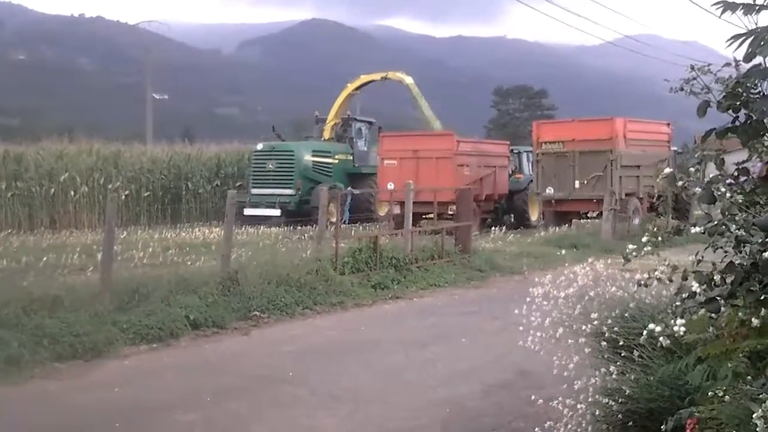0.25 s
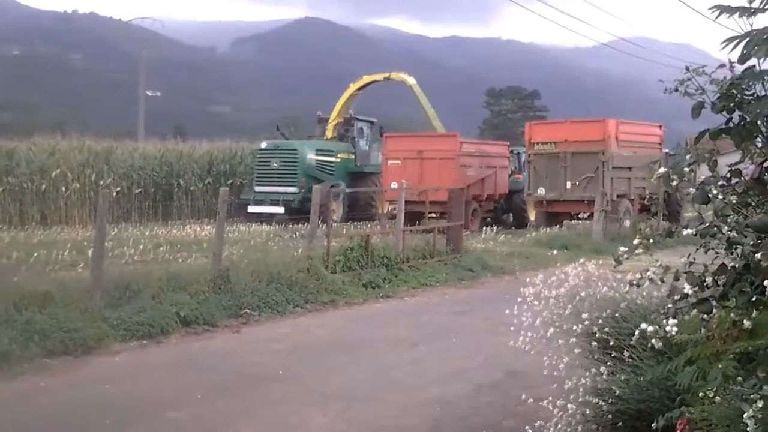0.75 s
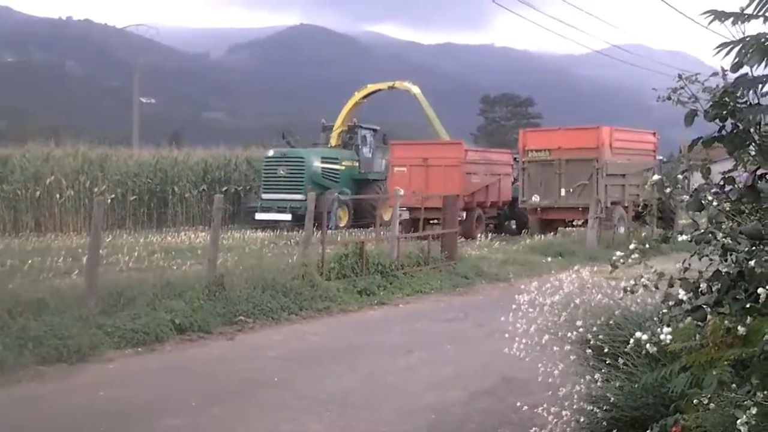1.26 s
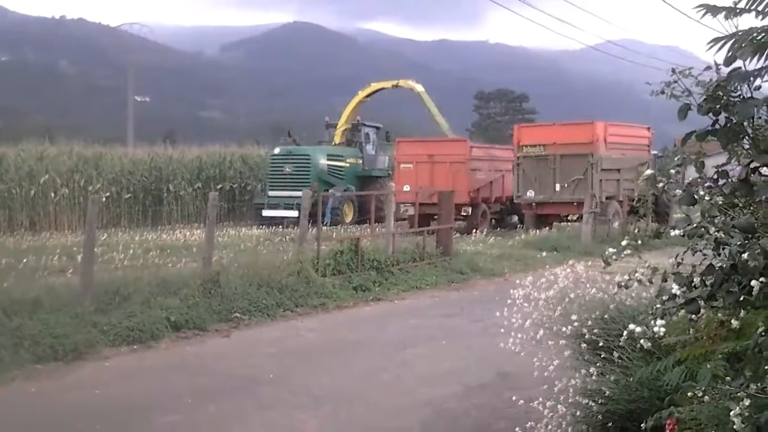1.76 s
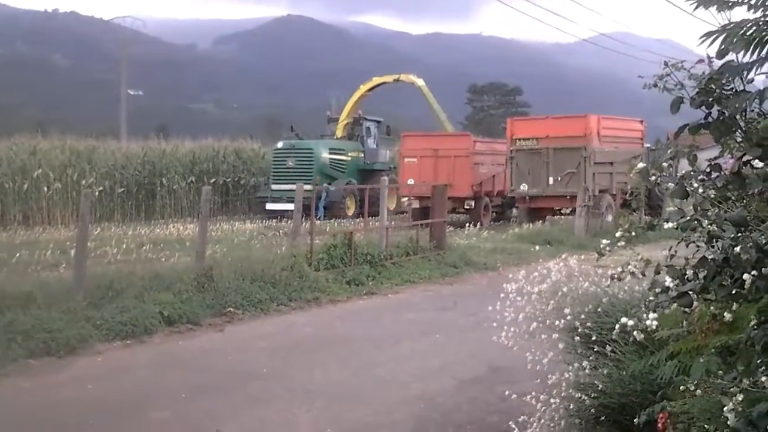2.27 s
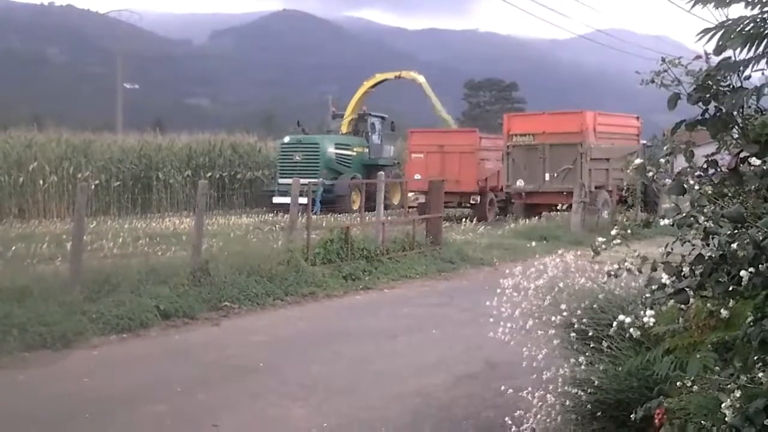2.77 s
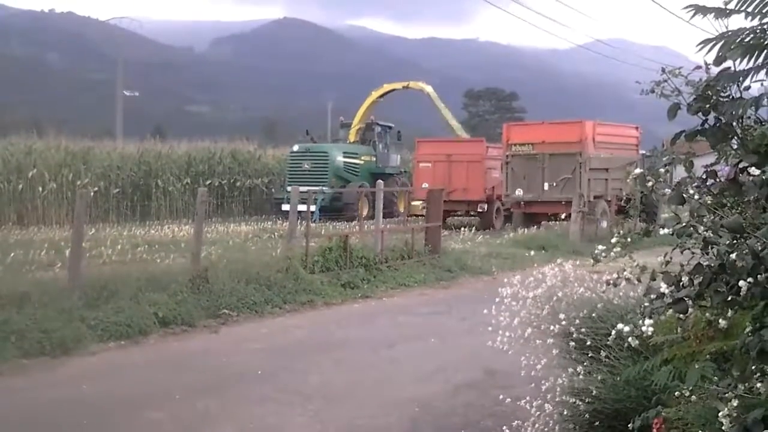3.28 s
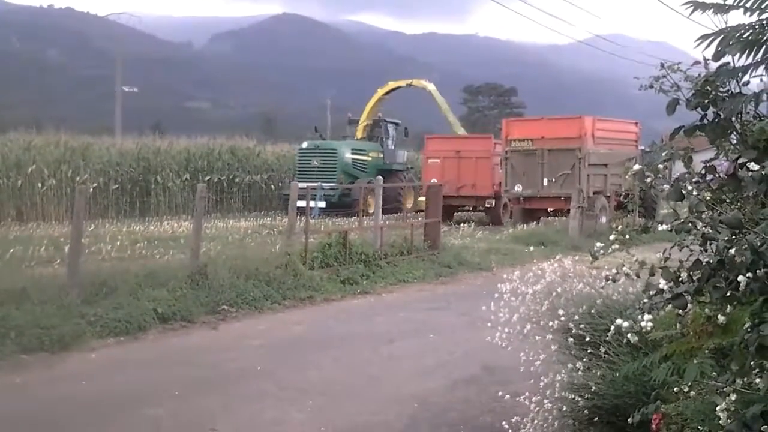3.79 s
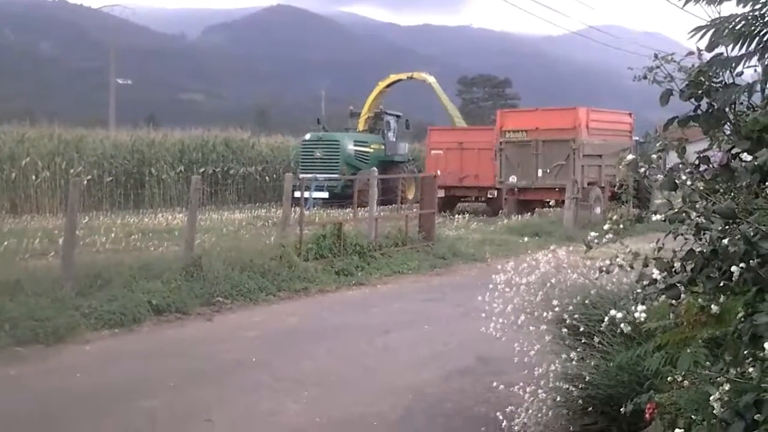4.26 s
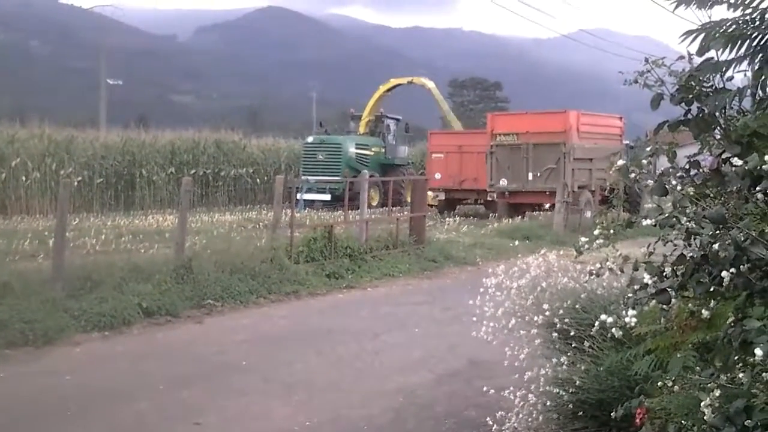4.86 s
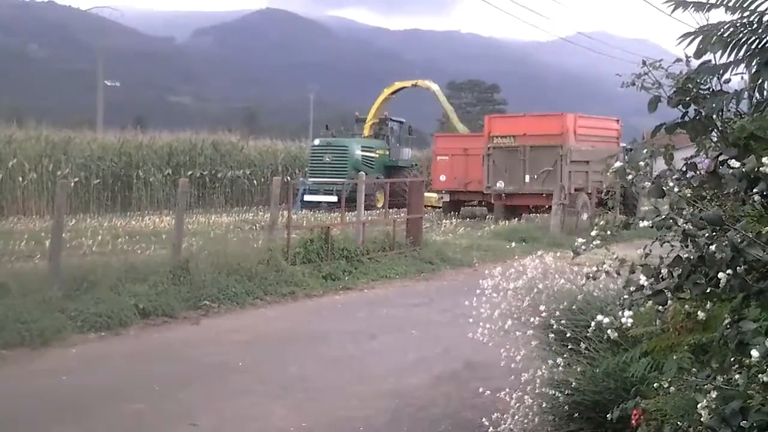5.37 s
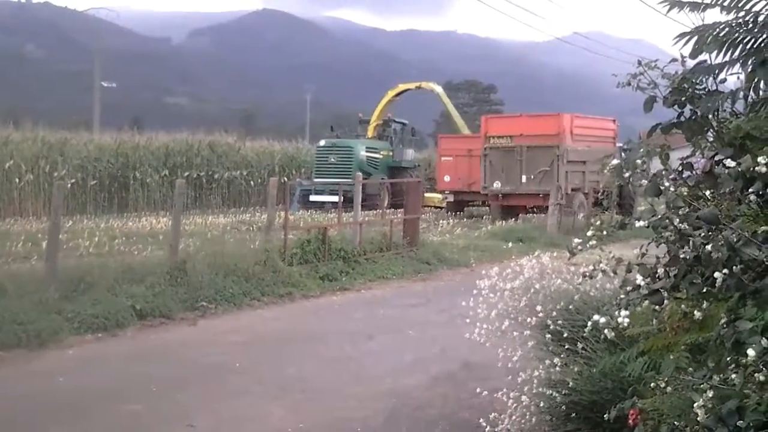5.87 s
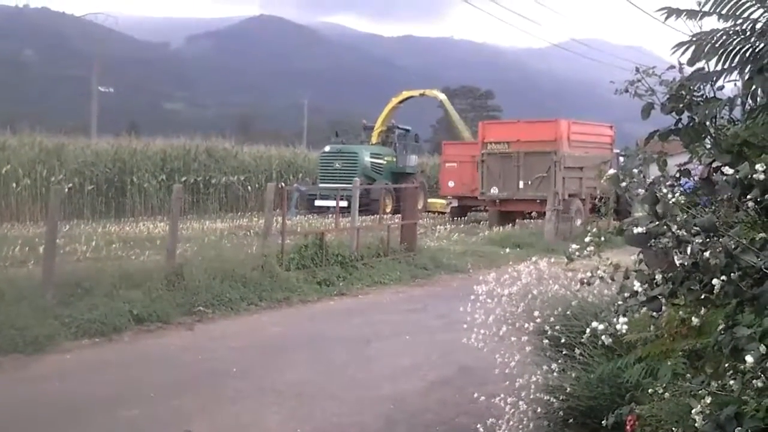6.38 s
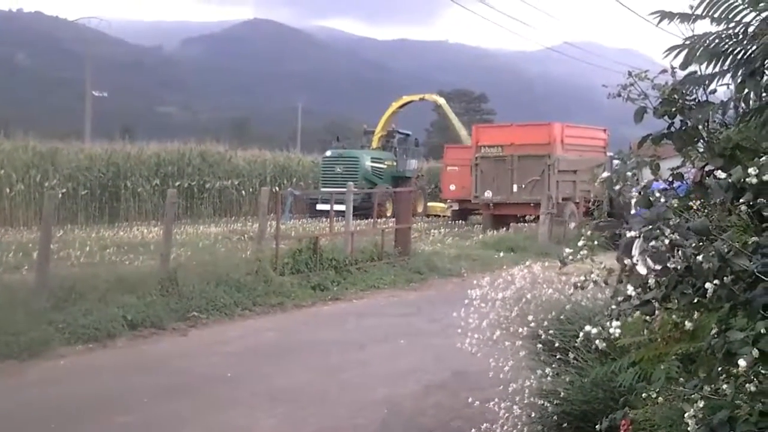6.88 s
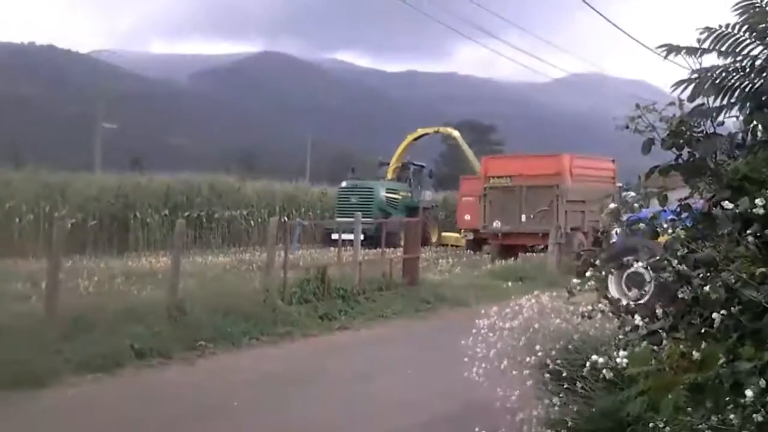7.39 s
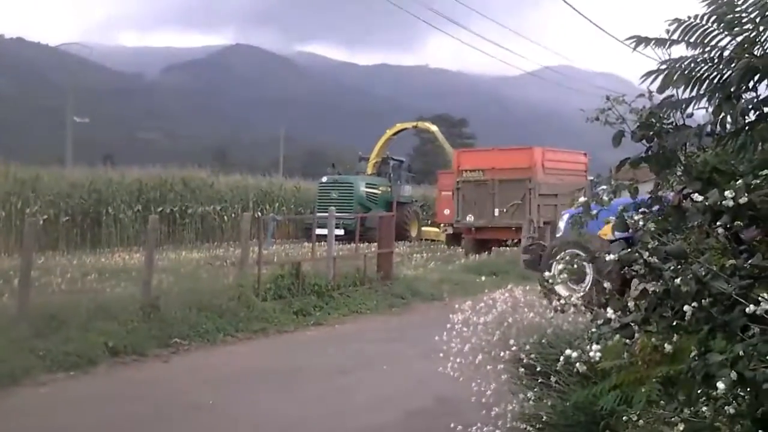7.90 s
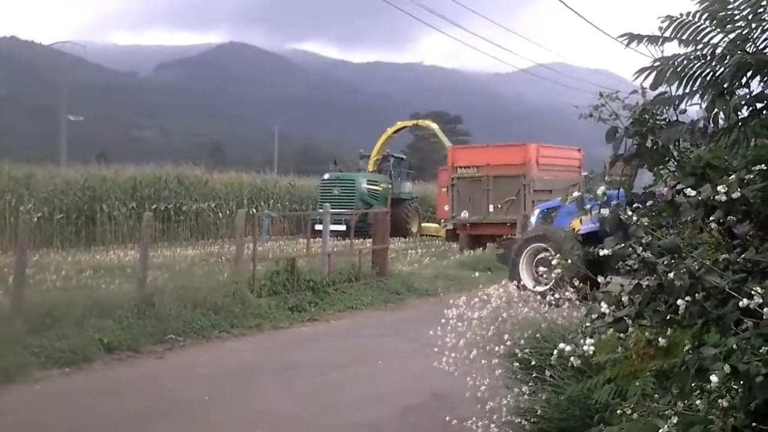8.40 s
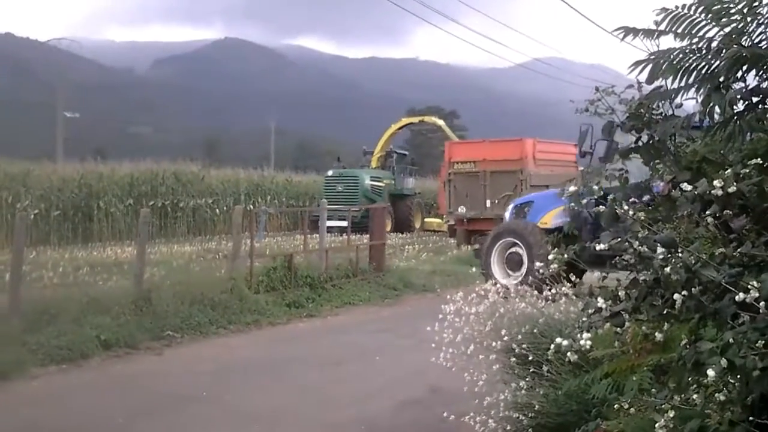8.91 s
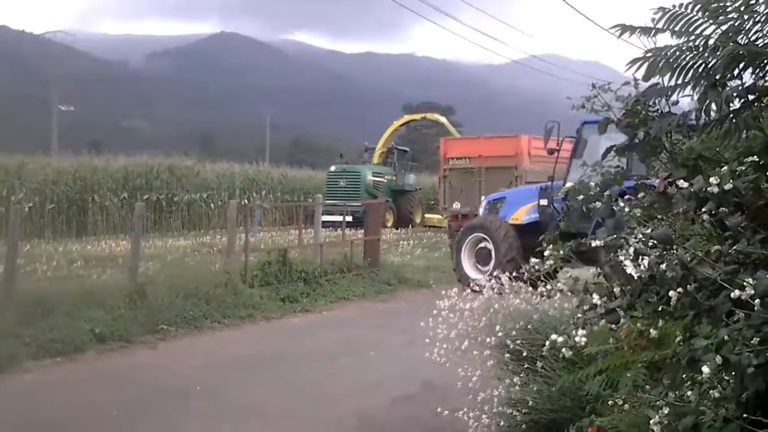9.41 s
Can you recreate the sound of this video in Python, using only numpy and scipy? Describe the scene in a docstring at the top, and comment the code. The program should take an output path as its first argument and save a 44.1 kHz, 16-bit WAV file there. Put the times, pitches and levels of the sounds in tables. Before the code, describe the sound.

A forage harvester is chopping maize in an open field from the start and runs for the whole ten seconds or so. Its diesel engine drones and clatters, with a swelling and sinking hum from the knives and a higher blower whine. Stalks rumble in the feed, howl around the drum and hiss up a steel spout, which rings in soft surges. The tones sag slightly together under load, around 1 second and most clearly near 5.7 seconds, then recover. The harvester slowly gets quieter throughout. Close to the microphone, leaves rustle very faintly in a few puffs from about 2.5 seconds on, and one short, dry tick sounds at about 5.6 seconds. From around 6 seconds a tractor draws near, its rush of engine and fan peaking just after 7 seconds, then easing a little and blending with the harvester to the end.

```python
"""In a maize field, a forage harvester chops the crop. One shaft turns its six-cylinder diesel, knife
drum and blower, so their notes sink together when thick crop drags the shaft down. Stalks rumble in
the feed, howl round the drum and hiss up the steel spout, which rings as wads hit it. The harvester
slowly fades. Close by, leaves rustle and something ticks once; a tractor draws near behind a bush."""
import sys
import numpy as np
from scipy.fft import rfft, irfft, next_fast_len
from scipy.io import wavfile
from scipy.ndimage import uniform_filter1d, minimum_filter1d, map_coordinates

SR = 44100
rng = np.random.default_rng(int(sys.argv[2]) if len(sys.argv) > 2 else 0)


def waveform_to_disk(signal):
    """Save audio, clipped to [-1, 1], as 16-bit WAV at the path in sys.argv[1]."""
    frames = np.transpose(np.atleast_2d(signal))
    scaled = np.clip(frames, -1, 1) * 32767
    samples = np.round(scaled).astype(np.int16)
    wavfile.write(sys.argv[1], SR, samples)


N = 425565
TURN_S = 5.55  # the harvester has finished turning by then


def seconds():
    """The time of each sample."""
    return np.arange(N) / SR


def amp(db):
    """Turn decibels into a number to multiply by."""
    return 10 ** (np.asarray(db) / 20)


def unit(x):
    """Scale a sound to an average strength (rms) of 1."""
    return x / np.sqrt(np.mean(x ** 2) + 1e-20)


def curve(rows):
    """Join (time, value) points with straight lines."""
    return np.interp(seconds(), *np.transpose(rows))


def swells(events, half_width_s):
    """A smooth bump or dip in dB around each (time, lift) event."""
    return sum(db * np.exp(-((seconds() - s) / half_width_s) ** 2) for s, db in events)


def wobble(rate):
    """A smooth random curve through `rate` points a second."""
    points = rng.standard_normal(int(N * rate / SR) + 4)
    return map_coordinates(points, [np.arange(0, N, 64) * rate / SR]).repeat(64)[:N]


def part_db(sag, start_db, db_per_s, db_per_sag):
    """A part's level drifts as the harvester moves and follows the sag (turns a second lost to load)."""
    return start_db + db_per_s * seconds() + db_per_sag * sag


def filtered(x, response):
    """Turn each frequency of x up or down by response(hz)."""
    size = next_fast_len(N + SR // 2)
    return irfft(rfft(x, size) * response(np.fft.rfftfreq(size, 1 / SR)), size)[:N]


def noise(spectrum, rings=(), drive=None):
    """Shape a drive (plain hiss if none is given) with a spectrum and its ringing peaks."""
    f, db = np.transpose(spectrum)
    lift = lambda hz: sum(g * np.exp(-.5 * ((hz - mid) / width) ** 2) for mid, width, g in rings)
    colour = lambda hz: amp(np.interp(np.log(hz + 1), np.log(f), db) + lift(hz))
    return unit(filtered(rng.standard_normal(N) if drive is None else drive, colour))


def tone(cycles, fade_db, flutter):
    """One note: its path over the field makes it fade in and out, the uneven load makes it flutter."""
    phase = 2 * np.pi * (cycles + rng.random()) + flutter * wobble(14)
    fading = amp(fade_db * wobble(2.02))
    return np.sqrt(2) * fading * (1 + flutter * wobble(14)) * np.sin(phase)


def firings(turns, depth, uneven):
    """Noise in puffs, three a turn, every other one louder; a little of it repeats every two turns."""
    cycle = rng.standard_normal(2048)
    repeating = unit(map_coordinates(cycle, [turns / 2 % 1 * len(cycle)], order=1, mode="grid-wrap"))
    rattle = .15 * repeating + .99 * rng.standard_normal(N)
    phase = 2 * np.pi * 3 * turns
    return rattle * np.exp(depth * np.cos(phase) + uneven * np.cos(phase / 2))


# The exhaust's main hum: t/s, level/dB
HUM_LEVEL = [(0, -31.5), (.45, -31), (1.0, -24.5), (1.55, -26.5), (1.85, -24), (2.2, -26), (2.5, -32),
             (2.95, -29.5), (3.4, -25), (3.9, -28.5), (4.35, -28), (5.05, -27.5), (5.33, -29.5),
             (5.55, -26), (6.0, -25), (6.3, -29), (6.75, -26.5), (7.3, -27.5), (8.1, -37.5), (8.5, -30.5),
             (9.1, -30.5), (9.55, -26.5)]
# Its strong notes: f/shaft speed, starting level/dB, drift/(dB per s), lift/(dB per unit of sag)
STRONG_NOTES = [(8, -27, -.5, 0), (9, -25.5, 0, 1), (10, -26, -0.72, 2), (11, -32.5, 0.66, 2),
                (12, -44, 0.75, -2), (21, -32.5, -0.79, -0.5), (22, -32.5, -0.82, 0.5),
                (22.5, -35, -0.2, 0.5), (23.5, -40, -0.73, 0)]
# One strong note swells or sinks: t/s, f/shaft speed, lift/dB, half width/s
NOTE_SWELLS = [(.25, 12, 8, .15), (.45, 10, -6, 0.44), (1.15, 10, 2, .3), (1.95, 23.5, 13, .25),
               (2.8, 23.5, 18.5, 0.21), (3.15, 9, -8, 0.22), (3.9, 22, 5, .25), (4.25, 8, -4, 0.21),
               (4.6, 10, -13, 0.47), (4.9, 11, -7, .24), (4.55, 9, 3, 0.27), (5.6, 8, -11, .2),
               (5.9, 11, 2.5, .35), (6.85, 22.5, 6, .4), (7.2, 12, 4, 0.18), (8.05, 12, 7.5, .22),
               (9.2, 21, 3.5, 0.44), (7.05, 8, -8, 0.2), (7.7, 9, 6.5, 0.15), (8.45, 11, -4, 0.12),
               (8.65, 10, 9, 0.42), (9.15, 11, 2, .3), (9.3, 9, -2.5, .5), (9.3, 10, 4, .3),
               (9.35, 8, 5.5, .25), (9.3, 12, 8, 0.45)]
# Its faint notes: f/shaft speed, level/dB
FAINT_NOTES = [(3, -56.5), (4, -47.5), (5, -54.5), (6.5, -53), (10.5, -36), (18, -51), (19, -43.5),
               (23, -43.5), (25, -44), (29, -45)]

def exhaust(turns, sag):
    """Exhaust puffs hum at twice the firing rate, among other notes tied to the shaft speed."""
    drone = amp(curve(HUM_LEVEL)) * tone(6 * turns, fade_db=.5, flutter=.085)
    for multiple, *level_rule in STRONG_NOTES:
        lift_db = sum(swells([(s, db)], half_s) for s, k, db, half_s in NOTE_SWELLS if k == multiple)
        level_db = part_db(sag, *level_rule) + lift_db
        drone += amp(level_db) * tone(multiple * turns, fade_db=.8, flutter=.057)
    return drone + sum(amp(db) * tone(k * turns, fade_db=2, flutter=.12) for k, db in FAINT_NOTES)


# The knife drum's note: t/s, level/dB
KNIFE_LEVEL = [(0, -16.5), (.2, -15.5), (.55, -24), (.72, -29.5), (.9, -17.5), (1.15, -16.5), (1.35, -20),
               (1.52, -26), (1.7, -16.5), (2.15, -36), (2.45, -23.5), (2.8, -18.5), (3.08, -27), (3.3, -22),
               (3.6, -29.5), (3.95, -22), (4.17, -25.5), (4.35, -26), (4.7, -28.5), (4.95, -23),
               (5.35, -16.5), (5.5, -22.5), (5.8, -17.5), (6.15, -25.5), (6.5, -19), (7.3, -27.5),
               (7.6, -24.5), (7.9, -22), (8.5, -27), (9.3, -28.5), (9.65, -35)]

def knives(turns, cuts_per_turn=7.6):
    """Knives sweep past a fixed bar so fast that the cuts blend into a note."""
    return amp(curve(KNIFE_LEVEL)) * tone(cuts_per_turn * turns, fade_db=.2, flutter=.1)


# The blower's main note swells or sinks: t/s, lift/dB
BLOWER_LIFTS = [(.7, -12), (2.75, 6), (3.95, 4), (4.95, 9.5), (5.65, -6), (6.3, 4), (7.1, 9.5), (7.6, 3),
                (9.3, -6)]
# Its other notes: f/paddle rate, level/dB
PADDLE_NOTES = [(2, -39.5), (4, -43), (5, -50.5), (6, -38), (7, -42), (8, -48.5)]

def blower(turns, sag, paddles_per_turn=3.433):
    """Paddles pass the blower's outlet; the main note is three times as fast as they pass."""
    paddles = paddles_per_turn * turns
    level_db = part_db(sag, -29.5, db_per_s=-.36, db_per_sag=-.5) + swells(BLOWER_LIFTS, .34)
    main = amp(level_db) * tone(3 * paddles, fade_db=1, flutter=.1)
    return main + sum(amp(db) * tone(k * paddles, fade_db=2.3, flutter=.15) for k, db in PADDLE_NOTES)


def gears(turns, sag, teeth_per_turn=28.66):
    """Gear teeth meet and make a faint whine."""
    level_db = part_db(sag, -40.5, db_per_s=-.55, db_per_sag=-.5)
    return amp(level_db) * tone(teeth_per_turn * turns, fade_db=1, flutter=.4)


# The feed's low rumble: f/Hz, level/dB
FEED_SPECTRUM = [(20, -50.5), (50, -56), (85, -38.5), (125, -28), (155, -17), (195, -14), (228, -13),
                 (285, 0.5), (345, -1), (390, -6), (430, -10.5), (500, -15.5), (580, -20), (640, -20),
                 (1000, -82.5)]
# The crop runs thin for a moment: t/s, level change/dB
FEED_LULLS = [(.6, -1.5), (3.2, -4), (4.2, -2), (5.55, -1.5)]

def feed(sag):
    """Stalks rumble as they are pulled in; near the end the rumble fades faster, baring the engine."""
    level_db = part_db(sag, -19.5, db_per_s=-.28, db_per_sag=.1) + swells(FEED_LULLS, .14)
    late_fade_db = -2.2 * np.maximum(seconds() - 8.5, 0)
    return amp(level_db + late_fade_db + .58 * wobble(5)) * noise(FEED_SPECTRUM)


# The howl round the drum: t/s, level/dB
HOWL_LEVEL = [(0, -24), (.6, -24), (1.1, -23), (2.55, -22.5), (3.1, -26), (3.55, -24.5), (3.9, -22),
              (4.3, -25.2), (4.65, -23), (5.1, -28), (5.5, -25), (5.95, -24.5), (6.3, -27.5), (6.6, -25.5),
              (7.1, -26), (7.6, -28), (9.65, -28.5)]
# Its overall colour: f/Hz, level/dB
HOWL_SPECTRUM = [(400, -48), (590, -18), (690, -6), (740, 1.5), (800, 1), (880, -2.5), (950, -10.5),
                 (1040, -10.5), (1200, -31.5), (2000, -73)]
# Narrow peaks and dips of the drum's housing: f/Hz, width/Hz, lift/dB
HOWL_RINGS = [(710, 10, -1.5), (740, 10, 2.5), (767, 10, -2), (788, 10, 2), (897, 14, 3)]

def drum_howl(turns):
    """Stalks howl in the drum's housing while the engine shakes it."""
    level_db = curve(HOWL_LEVEL) + .61 * wobble(12)
    return amp(level_db) * noise(HOWL_SPECTRUM, HOWL_RINGS, firings(turns, depth=.069, uneven=.079))


# Ringing sheet metal: f/Hz, width/Hz, lift at the start/dB, lift after the turn/dB
METAL_RINGS = [(1860, 45, -5.5, 0), (2060, 60, 7.5, 8), (2300, 80, -1, -0.5), (2502, 40, 5, 2.5),
               (2768, 152, 6, 5.5), (3260, 88, -7, -6.5), (3450, 66, 0.5, 4), (3850, 110, 2, -4),
               (4317, 163, 7.5, 5.5), (4530, 31, 1, 2.5), (4730, 80, 2.5, -5.5), (4880, 60, 2.5, 0),
               (5830, 150, -3.5, -0.5), (6190, 110, 4, 3), (6550, 70, -4, -2.5), (7300, 90, -7, -3),
               (7620, 110, 2, -3)]

def sheet_metal(spectrum, turns, depth, uneven, slide):
    """Engine puffs ring the panels; as the harvester turns, the peaks blend into slightly higher ones."""
    before = [(hz * (1 - slide), width, db) for hz, width, db, _ in METAL_RINGS]
    after = [(hz * (1 + slide), width, db) for hz, width, _, db in METAL_RINGS]
    start, end = (noise(spectrum, rings, firings(turns, depth, uneven)) for rings in (before, after))
    turned = np.minimum(seconds() / TURN_S, 1)
    return np.sqrt(1 - turned) * start + np.sqrt(turned) * end


# The engine's clatter: f/Hz, level/dB
CLATTER_SPECTRUM = [(500, -44.5), (1000, -3), (1350, -2), (1550, -6), (1750, -2), (2300, -6), (2900, -4.5),
                    (3250, -6.5), (4500, -17.5), (7000, -18.5), (10000, -69)]

def clatter(turns, sag):
    """Each firing knocks the engine block and rattles the hood."""
    level_db = part_db(sag, -21.5, db_per_s=-.49, db_per_sag=-.1) + .25 * wobble(14)
    return amp(level_db) * sheet_metal(CLATTER_SPECTRUM, turns, depth=.14, uneven=.057, slide=.011)


# Crop sliding on steel: f/Hz, level/dB
SPOUT_SPECTRUM = [(1500, -26), (3200, -7.5), (3600, -0.5), (4000, -2), (5000, -2.5), (5500, -9.5),
                  (6400, -14.5), (7600, -18), (8400, -28), (10000, -35.5), (11000, -73.5)]
# Wads hit the spout: t/s, lift of the low ring/dB, lift of the high ring/dB
WADS = [(.05, -6, 5.5), (.8, -2, 5), (1.35, 3, 1), (1.65, 7, -2), (2.25, 9.5, 1), (2.6, 7.5, 4.5),
        (3.4, 3, 4.5), (3.62, 6.5, 7.5), (3.85, 10.5, -1), (4.95, 8, 3), (5.35, 10, 4.5), (5.8, 10, 4.5),
        (6.1, 10, -5), (6.65, 11.5, 1), (6.901, 8, 0), (7.25, 9.5, 2), (7.75, -4, 4.5), (8.7, -2, 4)]
# The two rings: starting f/Hz, f after the turn/Hz, width/Hz, resting level/dB, drift/(dB per s)
SPOUT_RINGS = [(2697, 2790, 290, -35, -0.77), (4280, 4480, 210, -32, -0.69)]

def spout(turns, sag):
    """Crop hisses along the spout, and wads swell two rings that creep upward as the harvester turns."""
    times, *lifts = np.transpose(WADS)
    surges_db = [swells(zip(times, lift), half_width_s=.17) for lift in lifts]
    hiss_db = part_db(sag, -23, db_per_s=-.84, db_per_sag=-.4) + .18 * sum(surges_db) + .71 * wobble(16)
    out = amp(hiss_db) * sheet_metal(SPOUT_SPECTRUM, turns, depth=.14, uneven=.098, slide=.0082)
    turned = np.minimum(seconds() / TURN_S, 1)
    pulsing = amp(np.cos(2 * np.pi * 3 * turns))  # 1 dB up and down with each firing
    for (start_hz, end_hz, width_hz, rest_db, db_per_s), surge_db in zip(SPOUT_RINGS, surges_db):
        phase = 2 * np.pi * np.cumsum(start_hz + (end_hz - start_hz) * turned) / SR
        band = lambda hz: 1 / (1 + (2 * hz / width_hz) ** 2)
        # Multiplying by a wave moves low noise up to the ring's pitch.
        ring = sum(filtered(rng.standard_normal(N), band) * wave(phase) for wave in (np.cos, np.sin))
        level_db = rest_db + db_per_s * seconds() + surge_db + .8 * wobble(14)
        out += amp(level_db) * unit(ring * pulsing)
    return out


# Puffs of breeze in the bush: t/s, lift/dB
BREEZES = [(2.65, 6.5), (3.7, 6), (5, 7.5), (5.4, 5.5), (7.35, 3.5), (8.95, 5), (9.55, 6)]
# The thin rustle of leaves: f/Hz, level/dB
LEAF_SPECTRUM = [(2000, -24.5), (5000, -28), (8000, 13), (9000, 6), (10200, 10), (10900, -27.5),
                 (13000, -23)]

def leaves():
    """The breeze stirs nearby leaves in small, gritty flurries."""
    grit = amp(2.2 * wobble(300)) * rng.standard_normal(N)
    level_db = -53 + swells(BREEZES, half_width_s=.39) + 1.5 * wobble(25)
    return amp(level_db) * noise(LEAF_SPECTRUM, drive=grit)


# One tick close by: t/s, level/dB
TICK = [(5.579, -6)]

def tick():
    """A dry tick: three high blips at once, over in about a millisecond."""
    out = np.zeros(N)
    for s, db in TICK:
        t = seconds() - s
        for hz, blip_db, half_s in [(3800, -2, .00066), (6000, -15, .0002), (9700, -10.5, .00026)]:
            out += amp(db + blip_db) * np.exp(-(t / half_s) ** 2) * np.cos(2 * np.pi * hz * t)
    return out


# The tractor's rush: f/Hz, level/dB
TRACTOR_SPECTRUM = [(100, -28), (200, 1), (300, 10.5), (400, 12), (470, 5.5), (600, -6.5), (880, -6),
                    (1250, 5.5), (1600, -2.5), (2500, -14), (3300, -5), (4500, -8), (6000, -27.5),
                    (8000, -16.5), (10000, -25.5), (11000, -64)]
# Peaks and a dip from its hood: f/Hz, width/Hz, lift/dB
HOOD_RINGS = [(1995, 120, 11.5), (3020, 150, 11), (3455, 100, 12), (3830, 170, -14.5), (4360, 190, 12)]

def tractor(arrives_s=7.2, rise_db_per_s=5.5, fall_db_per_s=1):
    """The rush of the tractor's fan and engine grows until it arrives, then eases a little."""
    since = seconds() - arrives_s
    level_db = -26.5 + np.minimum(rise_db_per_s * since, -fall_db_per_s * since)
    return amp(level_db + 1.1 * wobble(8)) * noise(TRACTOR_SPECTRUM, HOOD_RINGS)


# The harvester's shaft slows in thick crop: t/s, speed/(turns per s)
SHAFT_SPEED = [(0, 36.18), (.3, 35.97), (1.1, 35.02), (1.5, 35.57), (1.7, 35.29), (2.05, 35.25),
               (2.65, 36.23), (2.9, 36.03), (3.2, 35.33), (4.0, 35.45), (4.25, 35.66), (4.6, 35.6),
               (5.08, 36.52), (5.68, 34.62), (6.3, 36.05), (6.7, 35.22), (7.05, 35.37), (7.35, 35.26),
               (7.7, 36.05), (8.1, 35.68), (8.45, 36.22), (8.7, 36.18), (9.65, 36.54)]

def scene():
    """One shaft drives the whole harvester; both channels carry the same sound."""
    speed = curve(SHAFT_SPEED)
    turns = np.cumsum(speed) / SR
    sag = 35.6 - speed  # turns a second below cruising speed
    notes = exhaust(turns, sag) + knives(turns) + blower(turns, sag) + gears(turns, sag)
    noises = feed(sag) + drum_howl(turns) + clatter(turns, sag) + spout(turns, sag)
    mono = notes + noises + leaves() + tick() + tractor()
    return np.array([mono, mono])


def record(dry):
    """A limiter eases down the loudest peaks, and the highest treble is cut off."""
    ceiling, window, top_hz = .9, int(.004 * SR), 13000
    needed_gain = ceiling / np.maximum(np.abs(dry), ceiling)
    gain = uniform_filter1d(minimum_filter1d(needed_gain, window), window)
    return np.array([filtered(channel, lambda hz: hz < top_hz) for channel in dry * gain])


dry = scene()
out = record(dry)
waveform_to_disk(out)
```